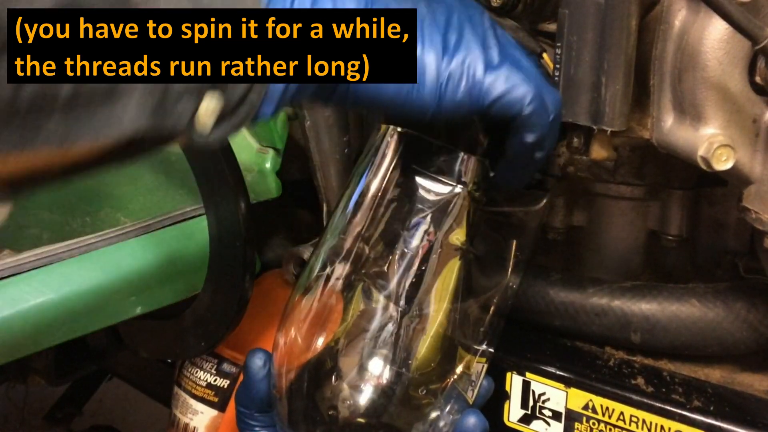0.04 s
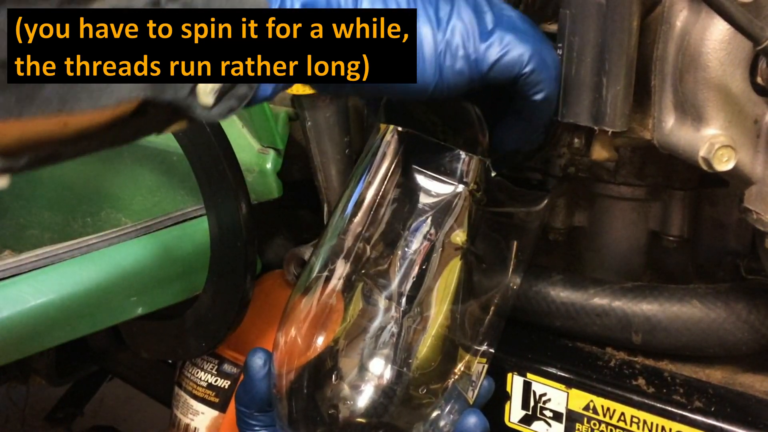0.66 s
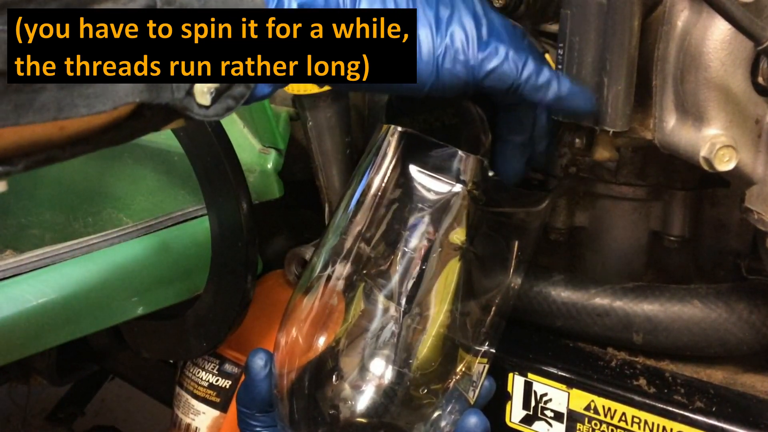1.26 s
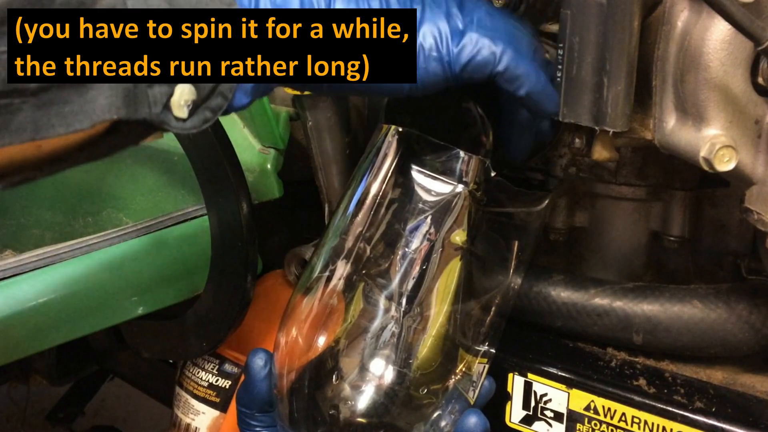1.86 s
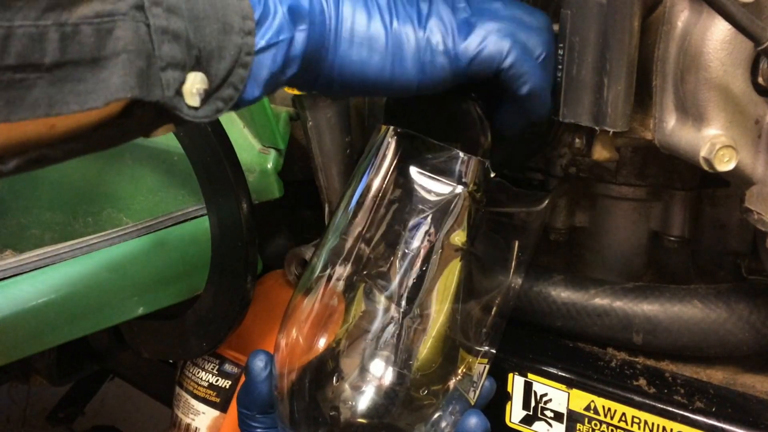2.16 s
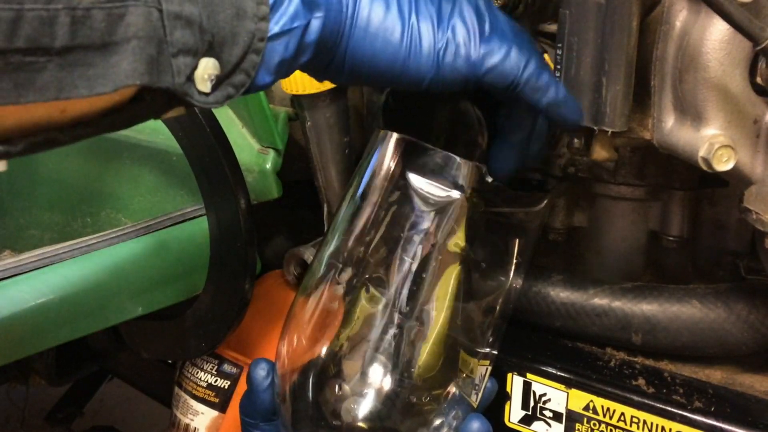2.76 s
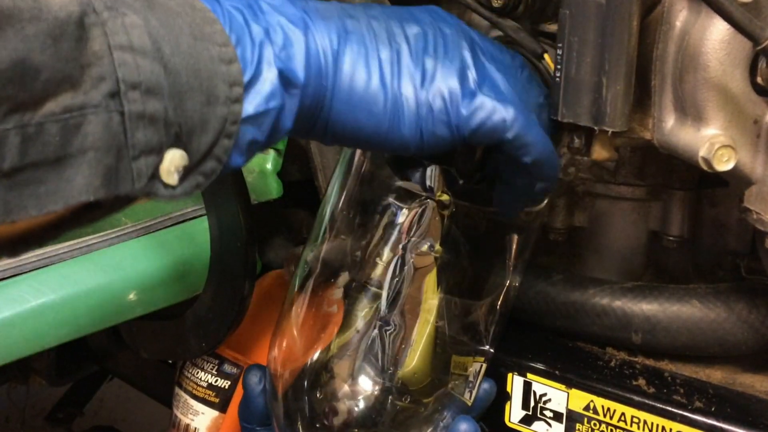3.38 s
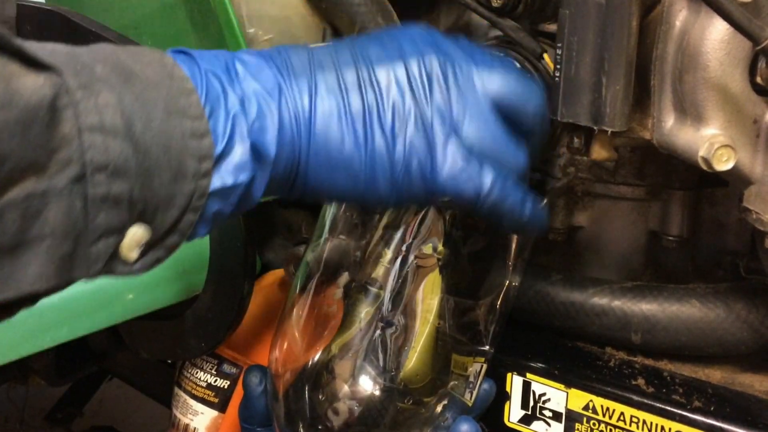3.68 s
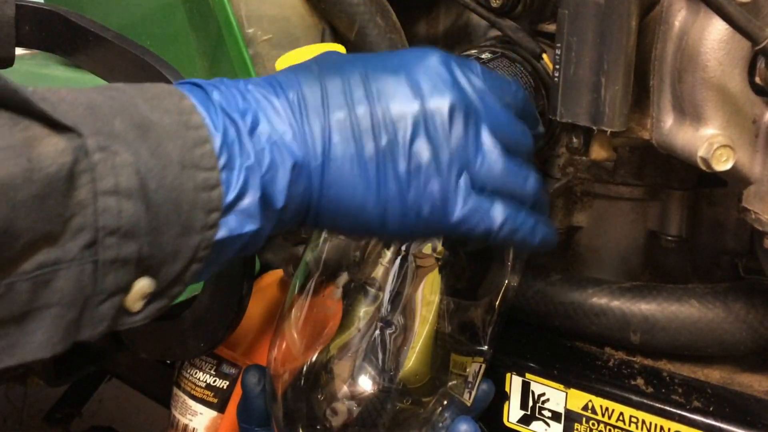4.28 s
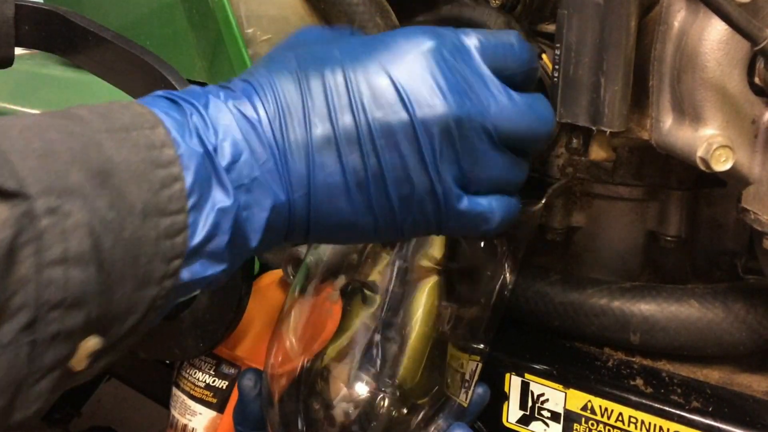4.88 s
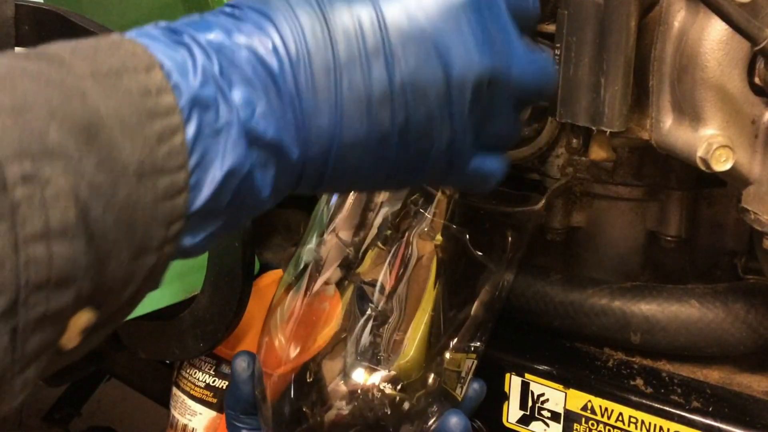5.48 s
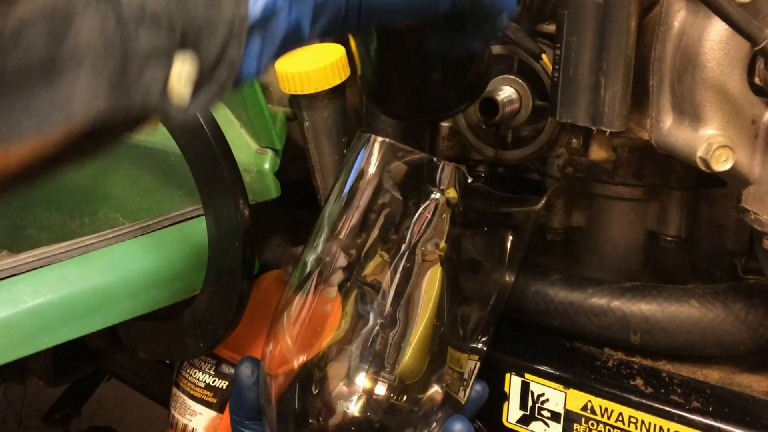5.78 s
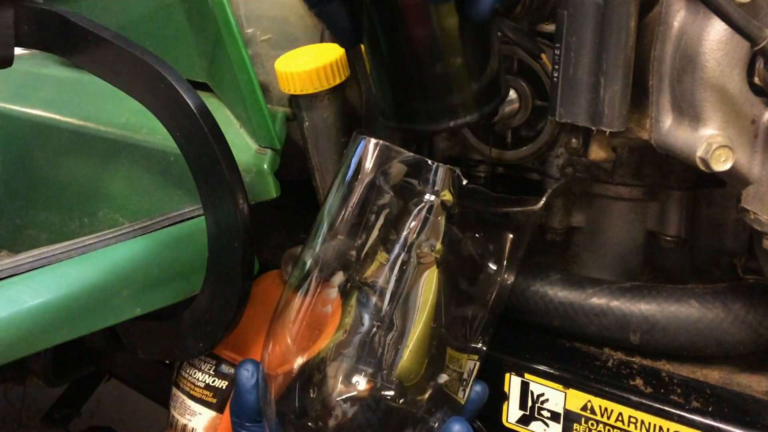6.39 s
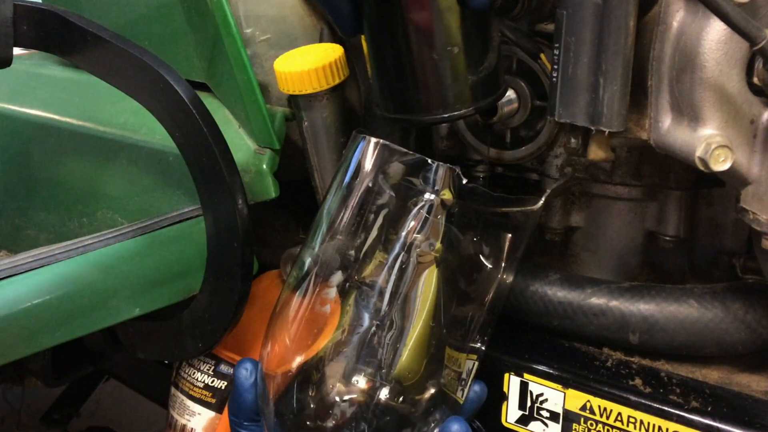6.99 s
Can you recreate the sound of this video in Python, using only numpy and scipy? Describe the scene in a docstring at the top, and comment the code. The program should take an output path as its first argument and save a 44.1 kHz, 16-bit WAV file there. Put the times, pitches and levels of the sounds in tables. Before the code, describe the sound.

Close, quick swishes and hollow slips come from a glove turning a metal oil filter, over faint garage air and a low hum. The can booms once as it loosens, then clanks several times with dull shudders from the engine, ending on one hard ringing knock. After a softer bump, oil drips and patters lightly into a thin plastic bottle, which ticks and snaps.

```python
"""Short hollow rubs and swishes, then metal knocks, a boom and small drips: an oil filter being unscrewed.
A gloved hand flicks the can round on an engine in a garage, above a cut-off plastic bottle.
The glove slips on the hollow can while sleeve and threads hiss; the loosening can thumps, rattles
and knocks free of its stud. Then oil drips and the thin bottle ticks as the filter drains."""
import sys
import numpy as np
from scipy import signal
from scipy.fft import irfft
from scipy.io import wavfile
from scipy.ndimage import uniform_filter1d

SR = 44100
rng = np.random.default_rng(int(sys.argv[2]) if len(sys.argv) > 2 else 0)


def persist_wave(psi):
    """Save psi, clipped to +-1, as 16-bit WAV."""
    counts = np.round(np.clip(psi, -1, 1) * 32767).astype(np.int16)
    wavfile.write(sys.argv[1], SR, np.atleast_2d(counts).T)


N = 314874
LET_GO_S = 5.6  # the filter comes off

# midrange rasp of the glove on the can: f/Hz, level/dB
SCRAPE_COLOUR = [(400, -22.5), (850, 1.5), (1700, -3), (2800, -10), (5000, -29)]
# bright edge of a crinkle or snap: f/Hz, level/dB
SNAP_COLOUR = [(1500, 7.5), (4000, 5), (9000, 2), (15000, 8.1)]


def amp(db):
    return 10 ** (np.asarray(db) / 20)


def seconds(count):
    return np.arange(count) / SR


def unit_rms(x):
    return x / np.sqrt(np.mean(x ** 2) + 1e-20)


def peaked(x, db):
    """Scales a sound so that its loudest 6 ms have the given level."""
    power = uniform_filter1d(x ** 2, size=256, mode="constant")
    return amp(db) * x / np.sqrt(power.max() + 1e-20)


def curve_at(points, hz):
    """Reads a curve along a logarithmic frequency axis."""
    f, value = np.transpose(points)
    return np.interp(np.log(hz + 1), np.log(f + 1), value)


def add(mix, s, sound):
    part = mix[max(round(s * SR), 0):][:len(sound)]
    part += sound[:len(part)]


def noise(colour, count):
    """Random-phase noise of rms 1 in the given colour."""
    hz = np.fft.rfftfreq(count, 1 / SR)
    spectrum = amp(curve_at(colour, hz)) * np.exp(2j * np.pi * rng.random(len(hz)))
    return unit_rms(irfft(spectrum, count))


def wander(rate, count):
    """A random drift that heads for a new value rate times a second."""
    steps = rng.standard_normal(8192)
    return np.interp(seconds(count) * rate, np.arange(len(steps)), steps)


def fade(t, t60, rise):
    """A quick attack and an exponential decay."""
    return (1 - np.exp(-t / rise)) * amp(-60 * t / t60)


def resonate(x, hz, width_hz):
    """One band-pass resonance."""
    return signal.lfilter(*signal.iirpeak(hz, max(hz / width_hz, .5), SR), x)


def scatter(per_s, start, end):
    """Random moments between start and end, each with a size and a pitch from 0 to 1."""
    gap, size, pitch = rng.random((128, 3)).T
    when = start + np.cumsum(2 * gap) / per_s
    return np.transpose([when, size, pitch])[when < end]


def effort_db(layer):
    """The level ride of one arm noise; the arm works hardest as the last threads let go."""
    # the arm at work: t/s, rumble/dB, glove drag/dB, sleeve rustle/dB
    effort = [(0, -58, -57.5, -64), (.15, -58, -65, -66.5), (.45, -77, -68.5, -70),
              (1.15, -68.5, -64.5, -69), (1.6, -80, -104, -69.5), (1.85, -69, -90, -67.5),
              (2.35, -72.5, -74, -67), (2.9, -69, -70, -68.5), (3.4, -69, -58.5, -65),
              (3.65, -68.5, -83, -70.5), (3.92, -62.5, -58.5, -68.5), (4.2, -70, -57, -73),
              (4.42, -59, -60, -74.5), (4.68, -59, -48, -76), (4.95, -64.5, -58.5, -67.5),
              (5.251, -71, -65.5, -75.5), (5.8, -83, -73.5, -70), (6.2, -80.5, -79.5, -78),
              (7.14, -79, -74.5, -78)]
    times, rumble, drag, rustle = np.transpose(effort)
    return np.interp(seconds(N), times, {"rumble": rumble, "drag": drag, "rustle": rustle}[layer])


def room_tone():
    """Still air and a faint, wavering hum."""
    # low hum: f/Hz, level/dB
    hum_tones = [(119.5, -72.5)]
    # dark bed of air: f/Hz, level/dB
    air_colour = [(20, -31), (40, -15.5), (70, -1), (120, -2.5), (170, -8), (420, -11), (650, -14.5),
                  (2050, -20.5), (3100, -23), (6200, -26), (12800, -31.5), (15400, -34)]
    t = seconds(N)
    hum = sum(amp(db) * np.sqrt(2) * np.sin(2 * np.pi * hz * t + .5 * wander(12, N))
              for hz, db in hum_tones)
    return hum + noise(air_colour, N) * amp(-70.5)


def handling():
    """The moving arm: lumpy rumble and the uneven drag of the glove on the hollow can."""
    # bass weight of the arm: f/Hz, level/dB
    rumble_colour = [(20, -21.5), (45, -4.5), (80, 9), (130, 4.5), (220, 4.5), (450, -36.5)]
    # dull drag of the glove: f/Hz, level/dB
    drag_colour = [(120, -19), (260, -4.5), (430, 2), (580, -3.5), (800, -9.5), (1600, -12.5), (3000, -19),
                   (8000, -37.5)]
    lumps_db, unevenness_db = 3 * wander(30, N), 2.5 * wander(60, N)
    rumble = noise(rumble_colour, N) * amp(effort_db("rumble") + lumps_db)
    drag = noise(drag_colour, N) * amp(effort_db("drag") + unevenness_db)
    singing_can = resonate(drag, hz=375.8, width_hz=9.8)
    return rumble + drag + singing_can


def swishes():
    """Each glove stroke is a flat-topped swish over the sleeve's uneven rustle, with fine crinkles."""
    # rubber sweeping round the can: middle t/s, level/dB
    strokes = [(.057, -59.5), (.355, -65), (0.534, -58), (.693, -65.5), (.892, -63.5), (1.111, -61),
               (1.243, -58), (1.455, -55.5), (1.641, -64.5), (1.838, -60), (2.024, -55.5), (2.153, -57.5),
               (2.38, -60.5), (2.533, -59.5), (2.715, -58), (3.09, -64.5), (3.299, -67), (3.46, -64.5)]
    # airy hiss of glove and sleeve: f/Hz, level/dB
    hiss_colour = [(600, -12.5), (1500, -3), (3300, 0), (6000, 0), (9000, -1.5), (12000, -4.5),
                   (15500, -13.5)]
    t, half_stroke_s = seconds(N), 0.032
    power = amp(effort_db("rustle") + 2.5 * wander(14, N)) ** 2
    for s, db in strokes:
        power += amp(db) ** 2 / (1 + ((t - s) / half_stroke_s) ** 8)
    _, _, bands = signal.stft(noise(hiss_colour, N), SR, nperseg=256)
    # the stretched rubber favours ever-changing pitches
    patches = uniform_filter1d(rng.standard_normal(bands.shape), size=7, axis=0)
    patches_db = 2 * unit_rms(uniform_filter1d(patches, size=14, axis=1))
    hiss = signal.istft(bands * amp(patches_db), SR, nperseg=256)[1][:N]
    pops = (rng.random(N) < 70 / SR) * rng.standard_normal(N)  # about 70 a second
    grain = noise(SNAP_COLOUR, 512) * fade(seconds(512), t60=0.026, rise=0.0004)
    crinkle = unit_rms(signal.oaconvolve(pops, grain)[:N])
    flicker_db = 0.99 * wander(810, N) + 0.68 * wander(55, N)
    return np.sqrt(power) * unit_rms(hiss * amp(flicker_db) + amp(-7) * crinkle)


def squeaks():
    """The threads give thin, fuzzy tones that glide as the filter changes speed."""
    # thread squeaks: t/s, length/s, first f/Hz, last f/Hz, level/dB
    glides = [(0.053, 0.16, 3420, 3090, -67), (4.947, 0.036, 812, 1397, -63.5)]
    out, t = np.zeros(N), seconds(11025)
    for s, length, first_hz, last_hz, db in glides:
        hz = np.interp(t, [0, length], [first_hz, last_hz]) * (1 + .07 * wander(900, len(t)))
        arch = np.sqrt(np.maximum(np.sin(np.pi * np.minimum(t / length, 1)), 0))
        add(out, s, amp(db) * np.sqrt(2) * arch * np.sin(2 * np.pi * np.cumsum(hz) / SR))
    return out


def slip(peak_s, swell_s, hz, db, scrape_db):
    """Rubber speeds over the hollow can and flicks off; the can coasts on. Returns start and sound."""
    # air inside the gloved can: f/Hz, level/dB
    cavity_colour = [(100, -16.5), (220, -6), (280, 3), (330, -9), (410, 9), (490, -4.5), (600, -1.5),
                     (720, -2), (1000, -5), (2500, -37.5)]
    # ring of the can spinning in its threads: f/Hz, width/Hz, level/dB
    coast_modes = [(273, 24, 3), (400, 25, 6), (597, 25, 0)]
    # fizzy top of the slip: f/Hz, level/dB
    fizz_colour = [(1500, -29), (3300, 3.5), (5200, -2.5), (6500, -5), (9000, -10.5), (15000, -19.5)]
    release_s, flick_s, coast_s = 0.014, 0.004, 0.074
    t = seconds(26460) - .15  # zero at the flick
    flick = .5 * np.exp(-(t / flick_s) ** 4)
    speed = np.exp(np.minimum(t / swell_s, -t / release_s)) + flick
    grip = amp(2.3 * wander(700, len(t)))  # tiny sticks and slips
    hollow = resonate(noise(cavity_colour, len(t)), hz, width_hz=180) * speed
    threads = rng.standard_normal(len(t)) * (t > 0) * np.exp(-t / coast_s)
    coast = sum(amp(mode_db) * resonate(threads, mode_hz, width)
                for mode_hz, width, mode_db in coast_modes)
    friction = noise(SCRAPE_COLOUR, len(t))
    wall_hz = rng.uniform(1400, 2600)  # the patch of wall under the finger colours the scrape
    scrape = (friction + 1.9 * resonate(friction, wall_hz, width_hz=160)) * grip * speed
    fizz = noise(fizz_colour, len(t)) * grip * speed ** 1.2
    body = peaked(hollow, db=0) + peaked(coast, db=-18)
    edge = peaked(scrape, scrape_db) + peaked(fizz, scrape_db - 3.5)
    return peak_s + t[0], amp(db) * (body + edge)


def glove_slips():
    """The flicks that turn the filter, and light brushes of the fingers among them."""
    # glove flicks: peak t/s, swell/s, hollow f/Hz, level/dB, scrape above that level/dB
    flicks = [(.128, 0.047, 250, -51, -17), (0.219, .023, 540, -44.5, -3.5), (.573, .017, 564, -50.5, -9),
              (0.724, .006, 412, -55.5, -19), (0.846, 0.013, 390, -61.5, 3.5),
              (.929, .024, 490, -47.5, -13), (1.027, .01, 535, -43.5, -6.5), (1.304, .004, 690, -56, -6),
              (1.376, 0.0049, 400, -48, -16), (1.406, 0.01, 570, -39.5, -3.5),
              (1.768, .018, 570, -50.5, -4.5), (1.85, .014, 380, -51.5, -6),
              (2.038, 0.0027, 590, -45.5, -10.5), (2.114, .011, 575, -36.5, -6),
              (2.466, .01, 570, -38, -9.5), (2.759, .003, 475, -50.5, -13), (2.87, .0084, 407, -42, 2.5),
              (2.915, .04, 407, -41.5, -11), (3.082, 0.0026, 503, -49.5, -25), (3.118, .01, 468, -47, -14),
              (3.225, .016, 433, -46, -7.5), (3.311, .0056, 516, -49, -8), (3.709, .014, 524, -46.5, -12.5),
              (3.81, .021, 442, -43, -4), (3.885, .0052, 416, -38.5, -14.5),
              (3.988, .003, 470, -39.5, -10.5), (4.526, .0046, 420, -37.5, -11),
              (4.606, .005, 420, -38.5, -1.5), (4.646, 0.031, 390, -27.5, -7), (4.704, .04, 494, -33, -9),
              (4.799, .008, 420, -46.5, -7), (4.918, .03, 380, -45.5, -13.5), (5.243, .017, 434, -53.5, -9),
              (5.313, .01, 460, -55.5, -8), (5.547, 0.0076, 460, -53, -9.5)]
    out = np.zeros(N)
    for flick in flicks:
        add(out, *slip(*flick))
    for s, size, pitch in scatter(per_s=3.4, start=0, end=LET_GO_S):
        add(out, *slip(s, swell_s=0.0054, hz=447 * 2 ** (pitch - .5), db=-63.5 + 11 * size, scrape_db=-9))
    return out


def bottle_crackles():
    """The squeezed bottle gives off faint, scattered crackles while the arm works above it."""
    out, t = np.zeros(N), seconds(1024)
    for s, size, pitch in scatter(per_s=5, start=0, end=LET_GO_S):
        crackle = resonate(rng.standard_normal(len(t)), hz=1200 * 6 ** pitch, width_hz=1800)
        add(out, s, peaked(crackle * fade(t, t60=.014, rise=.001), db=-69 + 8 * size))
    return out


def knocks():
    """Steel on steel: a crack and a clack, the shell ringing on, and a thud of the can underneath."""
    # the can hits its stud: t/s, ring/dB, thud above the ring/dB, crack above the ring/dB
    hits = [(0.479, -51, -3, -3.5), (2.555, -38, -4, -13.5), (3.325, -45.5, -2, -44),
            (3.769, -41.5, 3.5, -26), (3.972, -53, -16.5, -17.5), (4.256, -41.5, 0, -9),
            (4.2719, -32.5, 0.5, -11.5), (4.528, -37, -7.5, -10.5), (4.5833, -29, -11, -7),
            (4.667, -30.5, -4.5, -3), (4.675, -36.5, -11.5, 2), (5.004, -18.5, -5.5, -4.5)]
    # hand-damped steel shell: f/Hz, level/dB, t60/s
    shell_modes = [(970, -11.5, 0.27), (1113, -4.5, .14), (1330, -10, 0.11), (1502, 3, 0.033),
                   (1600, -5, .06), (1700, -9, 0.18), (1987, -4, 0.11), (2144, -10.5, 0.2),
                   (2430, -3.5, 0.14), (2520, -10, 0.18), (3520, -17.5, 0.11), (3910, -12.5, 0.07),
                   (4740, -10, 0.094), (5380, -12.5, 0.051), (6070, -12, 0.09)]
    # hard midrange of the hit: f/Hz, level/dB
    clack_colour = [(450, -28), (800, -3.5), (1050, 0), (1250, -2), (1500, 7), (2000, -3.5), (2600, -5.5),
                    (3200, -16), (6000, -41)]
    # bright attack: f/Hz, level/dB
    crack_colour = [(1800, -12.5), (2900, -2.5), (5000, 0), (6500, -4.5), (7800, -12), (10000, -18),
                    (12500, -21.5), (15500, -38.5)]
    # low body of the can: f/Hz, level/dB
    thud_colour = [(100, -28.5), (190, -5), (290, -3.5), (430, 4.5), (580, -4), (760, -9), (1500, -43)]
    out, t = np.zeros(N), seconds(20000)
    for s, ring_db, thud_db, crack_db in hits:
        shell = np.zeros(len(t))
        for hz, db, t60 in shell_modes:
            phase = 2 * np.pi * (hz * t + rng.random())
            blur = 1.7 * wander(62, len(t))  # the gripping hand keeps detuning the shell
            shell += amp(db) * fade(t, t60, rise=.0003) * np.sin(phase + blur)
        clack = noise(clack_colour, len(t)) * fade(t, t60=0.059, rise=0.00013)
        ring = peaked(clack, db=0) + peaked(shell, db=-6.5)
        crack_tail = amp(-23.5) * fade(t, t60=0.16, rise=.002)
        crack = noise(crack_colour, len(t)) * (fade(t, t60=0.041, rise=0.00049) + crack_tail)
        thud = noise(thud_colour, len(t)) * fade(t, t60=0.15, rise=0.0017)
        blow = peaked(ring, db=0) + peaked(crack, crack_db) + peaked(thud, thud_db)
        add(out, s, amp(ring_db) * blow)
    return out


def tick(hz, t60, db, snap_db):
    """A drip or snap briefly rings two modes of a patch of thin plastic and stirs the wall around it."""
    # oil spattering in the bottle: f/Hz, level/dB
    spatter_colour = [(250, -33), (550, -5.5), (900, 0), (1500, 0.5), (2500, -7), (5000, -30), (9000, -42)]
    t = seconds(4096)
    onset = 1 - np.exp(-(t / 0.0014) ** 2)  # the wall yields before it rings
    phase = 2 * np.pi * (hz * t + .11 * wander(500, len(t)))
    patch = (np.sin(phase) + amp(-18.5) * np.sin(1.75 * phase)) * fade(t, t60, rise=0.00047)
    wall = resonate(rng.standard_normal(len(t)), hz, width_hz=.8 * hz) * fade(t, 1.8 * t60, rise=.0008)
    ring = peaked(patch * onset, db=0) + peaked(wall * onset, db=-3)
    spatter = noise(spatter_colour, len(t)) * amp(5.8 * wander(332, len(t)))
    spatter *= fade(t, t60=0.102, rise=0.0018)
    crease_hz = rng.uniform(3900, 8270)  # every crease snaps at its own pitch
    snap = resonate(noise(SNAP_COLOUR, len(t)), crease_hz, width_hz=6700)
    snap *= fade(t, t60=0.03, rise=0.0003) * onset
    return peaked(ring + peaked(spatter, db=-3.5), db) + peaked(snap, db + snap_db)


def drips():
    """Clear drips and snaps on the bottle, and a patter of fine drops once the filter is tipped."""
    # ticks of the thin plastic: t/s, f/Hz, t60/s, level/dB, snap above that level/dB
    clear_ticks = [(0.622, 1230, 0.011, -54.5, -21), (2.502, 1230, 0.0043, -48.5, -30),
                   (3.638, 1210, 0.009, -55, -28), (5.442, 2020, .014, -73.5, 17.5),
                   (5.901, 2345, .014, -64, 1), (5.953, 2910, 0.0044, -47.5, -5),
                   (6.409, 1130, 0.014, -40.5, -31), (6.418, 4180, 0.012, -41, -32),
                   (6.44, 1270, .025, -49.5, -28), (6.478, 1290, .025, -52.5, -26),
                   (6.561, 2420, 0.047, -53, -1.5), (6.722, 1574, 0.011, -62, 0),
                   (6.769, 1713, 0.031, -53.5, -2), (6.796, 784, .027, -55.5, -26),
                   (6.833, 4350, 0.027, -62, -14), (6.849, 2560, .035, -62, -19),
                   (6.896, 2800, .014, -58, -7), (6.978, 1465, 0.015, -53.5, -5),
                   (6.986, 1680, 0.02, -55.5, -19.5), (7.011, 5540, 0.028, -61, -2),
                   (7.075, 1450, 0.027, -42.5, -21), (7.128, 2310, 0.11, -47.5, -17)]
    out = np.zeros(N)
    for s, hz, t60, db, snap_db in clear_ticks:
        add(out, s, tick(hz, t60, db, snap_db))
    for s, size, pitch in scatter(per_s=7, start=6.45, end=N / SR):
        add(out, s, tick(hz=1080 * 2 ** (2 * pitch), t60=0.019, db=-71.5 + 16 * size, snap_db=-13))
    return out


def engine_jolts():
    """Hand and can jolt the engine into a dull, low shudder."""
    # jolts: t/s, level/dB
    jolts = [(1.829, -50), (2.519, -49), (3.321, -55), (3.78, -48.5), (3.884, -48), (4.275, -40.5),
             (4.569, -49), (4.648, -39.5), (4.749, -47.5), (5.002, -38)]
    # deep weight of the engine: f/Hz, level/dB
    shudder_colour = [(25, -40.5), (60, 7.5), (130, 7.5), (220, -5), (400, -44)]
    out, t = np.zeros(N), seconds(16384)
    low_cut = signal.butter(2, 48, "high", fs=SR)
    for s, db in jolts:
        shudder = noise(shudder_colour, len(t)) * fade(t, t60=0.2, rise=0.0085)
        add(out, s, peaked(signal.lfilter(*low_cut, shudder), db))
    return out


def thumps():
    """A padded blow booms the can; neighbouring modes swing against each other, so it swells again."""
    # soft bumps: t/s, boom/dB, centre of the push f/Hz, its spread/octaves, slap/dB
    bumps = [(3.8722, -34.5, 426, 1.2, -71), (4.034, -14.5, 421, 2, -30), (5.9548, -38.5, 369, 0.43, -50.5),
             (6.4094, -65.5, 517, 0.66, -49)]
    # boom of the hollow can: f/Hz, level/dB, t60/s
    hollow_modes = [(216.5, -13, 0.36), (264.4, -10, 0.1), (375, -4.5, 0.06), (431.3, -5, 0.098),
                    (455, -1, 0.017), (528, -3, 0.1), (594, 1, 0.057), (550, -24, .4), (703, -17, .06)]
    out, t = np.zeros(N), seconds(20000)
    low_cut = signal.butter(2, 150, "high", fs=SR)  # a small can radiates no deep bass
    muffle = signal.butter(2, 1200, fs=SR)
    for s, boom_db, centre_hz, spread, slap_db in bumps:
        modes = np.zeros(len(t))
        for k, (hz, db, t60) in enumerate(hollow_modes):
            push = (-1) ** k / (1 + (np.log2(hz / centre_hz) / spread) ** 4)
            modes += push * amp(db) * fade(t, t60, rise=.0003) * np.sin(2 * np.pi * hz * t)
        boom = signal.lfilter(*low_cut, modes)
        slap = signal.lfilter(*muffle, noise(SCRAPE_COLOUR, len(t)) * fade(t, t60=.045, rise=.0008))
        add(out, s, peaked(boom, boom_db) + peaked(slap, slap_db))
    return out


def garage(x, wet_db, build_s):
    """Dense reflections, each band dying at its own speed, with a swell from the far wall."""
    # reverb decay of the garage: f/Hz, t60/s
    decay_times = [(100, 0.34), (400, 0.11), (900, 0.28), (1700, 0.42), (2600, 0.3), (5000, 0.25),
                   (12000, 0.28)]
    hz, frame_s, bands = signal.stft(rng.standard_normal(SR), SR, nperseg=256)
    decay = amp(-60 * frame_s / curve_at(decay_times, hz)[:, None])
    tail = signal.istft(bands * decay, SR, nperseg=256)[1]
    t = seconds(len(tail))
    far_wall = 0.17 * np.exp(-((t - .068) / 0.0077) ** 2)
    tail *= 1 - np.exp(-(t / build_s) ** 2) + far_wall
    return amp(wet_db) * signal.fftconvolve(x, tail / np.linalg.norm(tail))[:N]


def scene():
    """Steel, can and bottle ring in the garage; engine, threads and arm stay dry over the room tone."""
    steel = knocks()
    can = thumps() + glove_slips()
    bottle = drips() + bottle_crackles()
    room = garage(steel + amp(-1) * bottle, wet_db=-14.5, build_s=0.012)
    room += garage(can, wet_db=-17, build_s=.009)
    close = engine_jolts() + swishes() + squeaks() + handling()
    return (steel + can + bottle + room + close + room_tone())[None]


def record(dry):
    """A steep high cut takes off the very top of the treble."""
    high_cut = signal.firwin(511, cutoff=15450, window=("kaiser", 9), fs=SR)
    return signal.oaconvolve(dry, high_cut[None], "same")


dry = scene()
out = record(dry)
persist_wave(out)
```